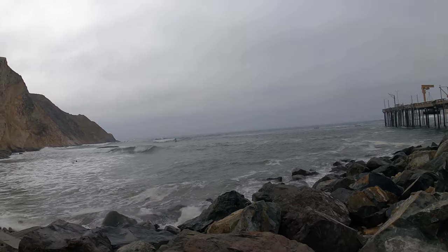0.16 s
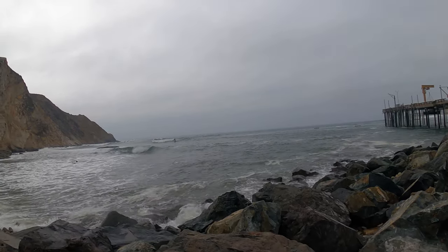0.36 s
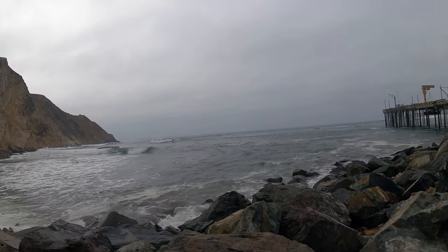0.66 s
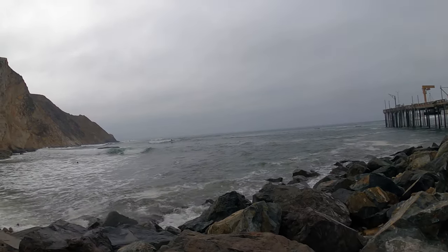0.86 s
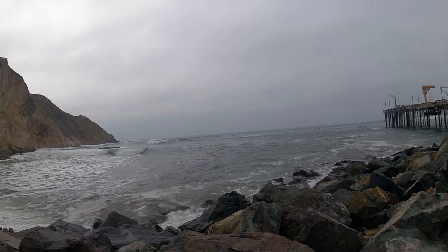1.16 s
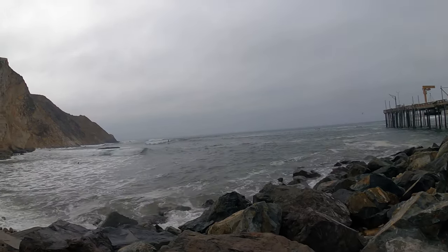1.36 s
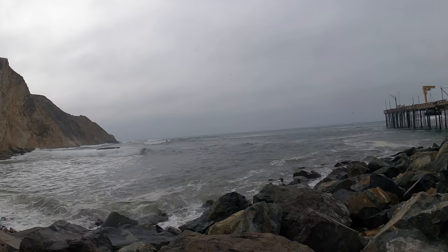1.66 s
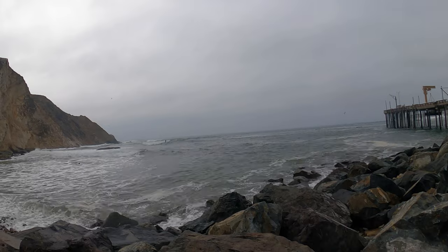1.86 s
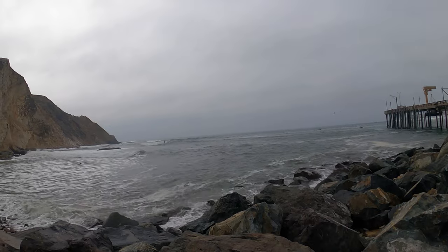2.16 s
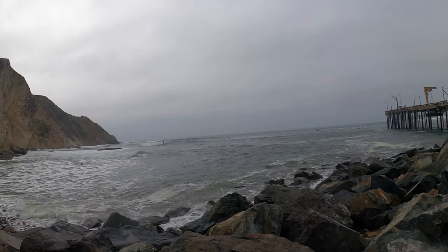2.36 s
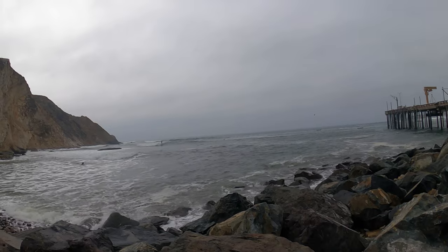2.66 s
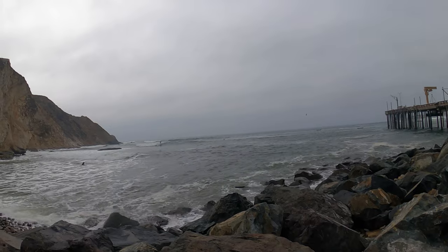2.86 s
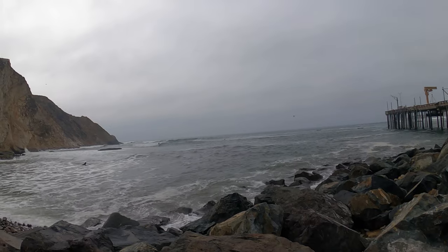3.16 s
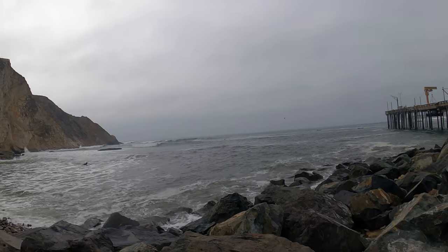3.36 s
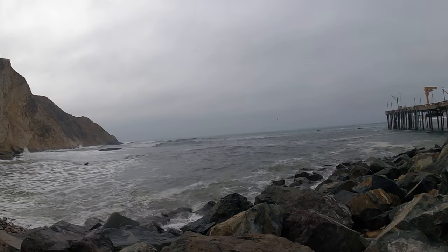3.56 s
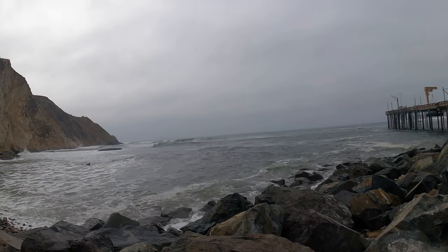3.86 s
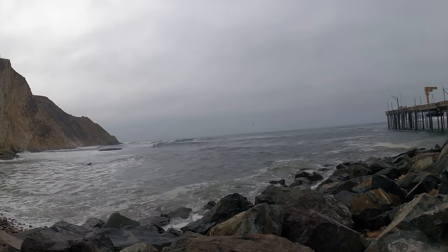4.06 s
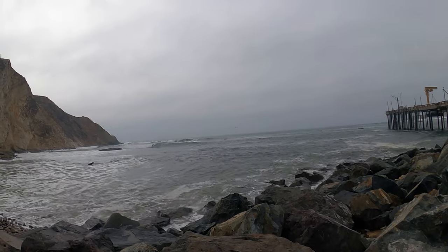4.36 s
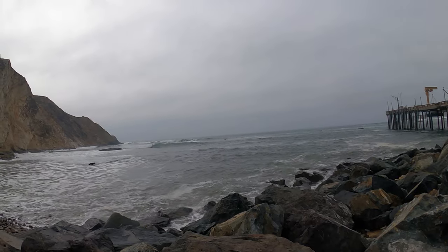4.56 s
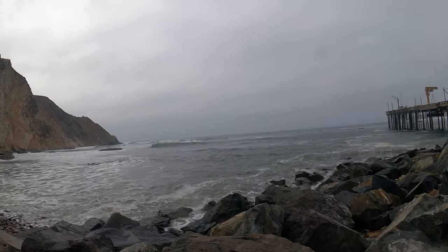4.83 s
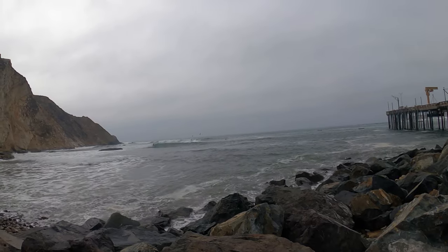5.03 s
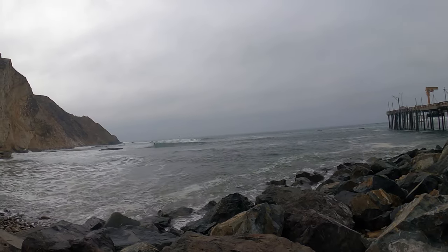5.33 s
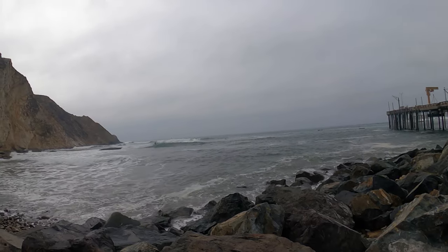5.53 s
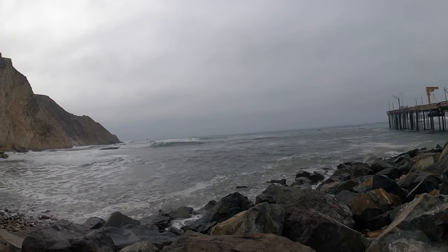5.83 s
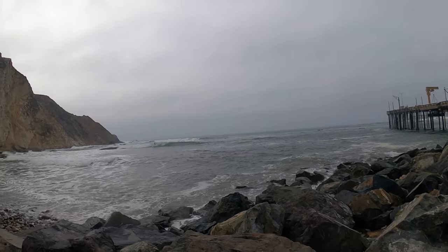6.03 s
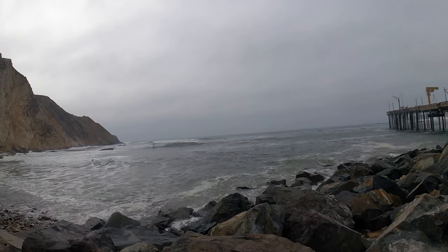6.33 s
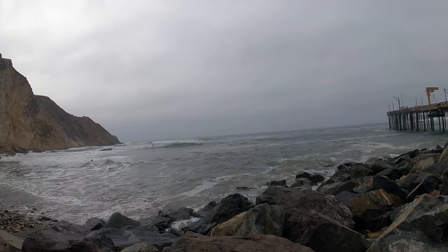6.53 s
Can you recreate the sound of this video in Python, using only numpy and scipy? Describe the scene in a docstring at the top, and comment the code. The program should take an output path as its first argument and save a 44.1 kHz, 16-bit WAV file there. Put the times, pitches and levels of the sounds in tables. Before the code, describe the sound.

Waves churn and glug between rocks, pause, then return with watery plops and splashes over steady foam wash and low wind rumble.

```python
"""A rocky shore, heard from the rocks above it: low surf runs in among the boulders.
Clouds of bubbles throb, churn, lap and gulp in the gaps; crests and splashes ring with swarms of bubbles.
Foam washes and fizzes over the stone, runoff trickles, and at last a wave drains back through shingle.
A breeze rumbles on the single microphone. Swarms of short rings and coloured noise make most of the water;
each gulp is a swelling tone, each lap a burst of resonant noise."""
import sys
import numpy as np
from scipy import signal
from scipy.fft import rfft, irfft, next_fast_len
from scipy.io import wavfile

SR = 44100
rng = np.random.default_rng(int(sys.argv[2]) if len(sys.argv) > 2 else 0)


def pcm_store(signal):
    """Save signal as 16-bit PCM."""
    levels = np.round(np.clip(np.atleast_2d(signal), -1, 1) * 32767)
    wavfile.write(sys.argv[1], SR, levels.astype(np.int16).T)


N = 295017  # samples

# Gusts of the breeze: t of the top/s, level/dB, swell time/s
GUSTS = [(0.12, -25, 0.1), (0.462, -24, 0.087), (0.75, -32.5, 0.13), (1.151, -28, 0.18),
         (1.65, -27.5, 0.15), (2.25, -32, 0.18), (2.79, -28, 0.095), (3.63, -29, 0.13), (4.48, -26, 0.14),
         (4.85, -33, .15), (5.22, -29.5, 0.13), (5.72, -29, .15), (6.39, -22.5, 0.12), (6.65, -25, 0.092)]
# Colour of the wind on the microphone: f/Hz, level per Hz/dB
WIND_COLOUR = [(3, -22), (10, -7), (22, -8.5), (40, 0), (57, 2.5), (76, -1), (100, -0.5), (150, -11.5),
               (300, -17.5), (700, -65)]
# Colour of pebbles rolling in the backwash: f/Hz, level per Hz/dB
SHINGLE_COLOUR = [(600.0, -12), (1000.0, -1), (1300.0, -13), (1450.0, 1.5), (1750.0, -2), (2300.0, -3.5),
                  (2620.0, -6.5), (3050.0, -5), (3400.0, -10.5), (3850.0, -5), (4150, -9.5), (4600.0, -7),
                  (5020.0, -15), (5400, -15.5), (6500.0, -20.5), (12000.0, -44)]
# Water streaming off the nearest boulders: t/s, level/dB
RUNOFF = [(0, -46), (1.08, -46), (1.45, -43.5), (1.7, -46.5), (2.3, -60), (2.7, -65)]
# Colour of that trickle: f/Hz, level per Hz/dB
RUNOFF_COLOUR = [(1500, -28), (1920, -18), (2100, -4), (2400, -0.5), (2650, -7.5), (2870, -15),
                 (3300, -6.5), (3650, -11), (3980, -22), (4300, -10), (4600, -12.5), (4950, -7.5),
                 (5800, -12), (7000, -35)]
# Amount of foam on the rocks, as the level of its hiss before the fizz trim: t/s, level/dB
FOAM = [(0.1, -58.5), (1.05, -60), (1.18, -57.5), (1.69, -56.5), (1.98, -59), (2.3, -60.5), (2.45, -58),
        (2.6, -60.5), (3.25, -57.5), (3.4, -61.5), (4.6, -59), (5.5, -62.5), (5.75, -60.5), (6.07, -60.5),
        (6.6, -57.5)]
# Colour of the bursting foam: f/Hz, level per Hz/dB
FIZZ_COLOUR = [(2500, -22), (4400, 2.5), (5500, -.5), (6500, -4.5), (7700, -8), (9000, -14.5),
               (11000, -19.5), (13000, -23), (14000, -27.5), (15000, -35)]
# Colour of white water spilling over stone: f/Hz, level per Hz/dB
WASH_COLOUR = [(400.0, -25), (850.0, -2.5), (1040.0, 0.5), (1270.0, -1), (1550.0, -4.5), (1750, -3),
               (1920.0, -1.5), (2200.0, -0.5), (2750.0, -6), (3100.0, -5), (3650.0, -8), (4500.0, -8.5),
               (4950.0, -16), (6000.0, -19), (10000.0, -47)]
# Water thrown against a boulder: t/s, level before the trim/dB, swell time/s, pitch of the drops f/Hz
SPLASHES = [(0.02, -44, 0.065, 1060), (1.18, -45, 0.039, 1500), (1.33, -41, .02, 1150),
            (1.36, -46, 0.09, 2300), (1.505, -39, 0.014, 1050), (1.6, -43, .04, 1600),
            (2.12, -43, .03, 1500), (2.32, -42, .03, 2150), (2.366, -39, .0064, 1100),
            (2.465, -41, 0.021, 1150), (2.62, -46, .0064, 1300), (4.47, -48, 0.027, 1500),
            (4.72, -43, 0.02, 1000), (4.883, -34.5, 0.0099, 900), (5.21, -40, 0.01, 1550),
            (5.69, -49, 0.044, 1300), (6.39, -37, .012, 1100), (6.53, -38, .022, 1600)]
# Colour of the patter before each splash picks its pitch: f/Hz, level per Hz/dB
SPLASH_COLOUR = [(500, -16), (900, 5.5), (1500, -0.5), (2400, 0.5), (3200, -10), (6000, -32)]
# Waves running in, before each layer's lag and linger:
# t/s, rise/s, hold/s, fall/s, deep rumble level/dB, churn level/dB, breaking crest level/dB
WAVES = [(-0.4, 0.23, 0.15, 0.47, -28, -36, -49), (1.07, 0.063, 0.64, 0.23, -28.5, -31, -43.5),
         (1.6, 0.44, 0.51, 0.26, -30, -30, -43.5), (4.052, 0.4, 0.47, 0.24, -33.5, -31.5, -47.5),
         (4.978, 0.14, 0.16, 0.051, -45, -31.5, -46), (5.553, 0.075, 0.1, 0.33, -32, -32.5, -45),
         (6.147, 0.44, 0.4, .4, -24.5, -29, -44)]
# Colour of the breaking crests: f/Hz, level per Hz/dB
BREAKER_COLOUR = [(400.0, -1), (860.0, -0.5), (1000.0, 0), (1500.0, 7), (1900.0, 4.5), (2400.0, -1.5),
                  (3080.0, -0.5), (3400, -26), (4000.0, -39), (8000.0, -38)]
# Colour of the throbbing bubble clouds: f/Hz, level per Hz/dB
RUMBLE_COLOUR = [(50, -42), (92, -8.5), (125, 0.5), (165, 1.5), (205, -3), (240, -1.05), (305, -2.4),
                 (345, -9.5), (430, -18.5), (800, -68)]
# Colour of the glugging water between the rocks: f/Hz, level per Hz/dB
CHURN_COLOUR = [(200, -23), (325, -3.5), (385, 0), (455, -2.5), (510, 0.5), (595, 1.5), (640, -6.5),
                (740, -10.5), (840, -21), (1200, -37)]
# Wavelets slapping into hollows: t/s, level before the trim/dB, swell time/s, pitch of the hollow f/Hz
LAPS = [(0.0, -26, 0.018, 330), (0.27, -28.5, 0.025, 430), (0.9, -21, 0.042, 317), (1.19, -19.5, .014, 580),
        (1.68, -27, .05, 288), (1.83, -23.5, .02, 380), (1.98, -22, .016, 560), (2.275, -20.5, 0.03, 278),
        (2.35, -22, 0.016, 190), (2.403, -26, 0.014, 290), (4.607, -19, 0.0099, 340),
        (4.882, -21, .007, 596), (5.0, -28, 0.022, 570), (5.19, -23, 0.0094, 314), (5.6, -28, .025, 260),
        (6.435, -19.5, 0.019, 320), (6.57, -24, .014, 330)]
# Air pockets trapped under the boulders: t/s, peak level before the trim/dB, pitch f/Hz, swell time/s
GULPS = [(0.06, -14, 148, 0.0081), (0.129, -14, 125, 0.0098), (0.257, -18.5, 615, 0.0044),
         (0.31, -18, 477, 0.0028), (0.86, -14, 272, 0.011), (1.205, -14.5, 554, 0.004),
         (1.411, -26, 181, 0.0074), (1.439, -13, 273, 0.0096), (1.495, -14, 530, 0.0025),
         (1.613, -13, 140, 0.0075), (1.80, -11, 140, 0.011), (1.833, -14, 286, 0.0045),
         (1.864, -10, 144, 0.0085), (1.996, -18, 442, 0.0072), (2.159, -7.5, 162, 0.0058),
         (2.299, -16.5, 267, 0.0094), (2.37, -19, 590, .0022), (2.371, -8.5, 210, 0.0097),
         (2.581, -14, 550, 0.0041), (2.914, -14, 170, 0.014), (3.281, -11, 136, 0.013),
         (3.949, -19, 155, 0.0097), (4.241, -22, 161, 0.013), (4.27, -15.5, 540, 0.0037),
         (4.448, -20, 128, 0.012), (4.612, -15, 268, 0.0069), (4.91, -7, 555, 0.0038),
         (4.915, -11.5, 298, 0.0028), (5.005, -15, 527, 0.0022), (5.206, -13.5, 229, 0.0048),
         (5.227, -5.5, 138, 0.0094), (5.27, -12.5, 533, 0.0041), (5.358, -10, 129, 0.0048),
         (5.604, -13, 200, 0.011), (5.666, -9, 155, 0.0037), (6.203, -12, 265, 0.0054),
         (6.381, -12, 267, 0.0054), (6.466, -9.5, 281, 0.0086), (6.594, -11, 272, 0.0094)]
# Dips in the microphone's response: f/Hz, width/Hz, depth as level/dB
DIPS = [(848, 120, -3.5), (1930, 170, -1.7), (2790, 270, -0.5), (3420, 290, -2), (4050, 260, -1.5),
        (5100, 360, -1)]

BREEZE_DB = -31  # steady draught under the gusts
# The backwash grows louder through the shingle, then runs steadily
BACKWASH_FULL_S, BACKWASH_DB, BACKWASH_GROWS_DB_PER_S = 6.5, -34.5, 10
# Level with average foam at t = 0; share of the foam's swing; slow build
WASH_DB, WASH_FOLLOWS, WASH_GROWS_DB_PER_S = -41, 0.36, 0.25
SPLASH_Q = 2.7  # pitch over bandwidth
LAP_WIDTH_HZ, LAP_TOP_HZ = 175, 725
GULP_RISE = 0.013  # share by which the pitch climbs in one swell time
CUTOFF_HZ = 15100  # top of the microphone's range


def from_db(db):
    """Decibels to gain."""
    return 10 ** (np.asarray(db) / 20)


def rms_one(x):
    """Scale to an rms of 1."""
    return x / np.sqrt(np.mean(x ** 2) + 1e-20)


def in_time(rows):
    """Join the points of a table into a curve at every sample."""
    return np.interp(np.arange(N) / SR, *np.transpose(rows))


def coloured(x, spectrum):
    """Give a sound a spectrum, with nothing above its last point; rms 1."""
    hz, db = np.transpose(spectrum)
    size = next_fast_len(N + SR // 2)
    bins_hz = np.maximum(np.arange(size // 2 + 1) * SR / size, 1)
    gain = from_db(np.interp(np.log(bins_hz), np.log(hz), db, right=-np.inf))
    return rms_one(irfft(rfft(x, size) * gain, size)[:N])


def drift(rate_hz):
    """Smooth random wandering, about `rate_hz` changes a second; spread 1."""
    step = 40  # samples between the slow points
    pole = np.exp(-2 * np.pi * rate_hz * step / SR)
    noise = rng.standard_normal(N // step + 2002)
    slow = signal.lfilter([1], [1, -2 * pole, pole * pole], noise)[2000:]  # skip the filter's start
    return np.interp(np.arange(N) / step, np.arange(len(slow)), rms_one(slow))


def grains(per_s, low_hz, high_hz, cycles, spread_db, clump_db, count):
    """A swarm of small rings of uneven size, clumped, with an even spectrum between its edges; rms 1."""
    sizes = from_db(spread_db * np.minimum(rng.exponential(1, N), 4)) * rng.choice([-1, 1], N)
    clicks = sizes * (rng.random(N) < per_s / SR)
    dealt = rng.integers(0, count, N)  # which pitch each click strikes
    out = np.zeros(N)
    for k, hz in enumerate(np.geomspace(low_hz, min(high_hz, CUTOFF_HZ), count)):
        w = 2 * np.pi * hz / SR
        r = np.exp(-np.log(1000) * hz / (cycles * SR))  # down 60 dB after `cycles` cycles
        struck = clicks * (dealt == k) + 1e-18  # the tiny offset keeps the filter from stalling
        ring = signal.lfilter([1 - r, 0, r - 1], [1, -2 * r * np.cos(w), r * r], struck)
        out += ring * from_db(clump_db * drift(14.4))
    return rms_one(out)


def blur(low_hz, high_hz):
    """Countless far bubbles merge into smooth noise; rms 1."""
    band = signal.butter(1, [low_hz, min(high_hz, CUTOFF_HZ)], "band", fs=SR, output="sos")
    return rms_one(signal.sosfilt(band, rng.standard_normal(N)))


def breeze():
    """Level in dB of the wind: gusts swell and fade over a steady draught."""
    t = np.arange(N) / SR
    gusts = sum(from_db(db) ** 2 * np.exp(-((t - s) / swell) ** 2) for s, db, swell in GUSTS)
    return 10 * np.log10(from_db(BREEZE_DB) ** 2 + gusts)


def wind(level_db, lump_db):
    """Eddies buffet the microphone port in lumps."""
    gain = from_db(level_db + lump_db * drift(4.8))
    return gain * coloured(rng.standard_normal(N), WIND_COLOUR)


def shingle(level_db, far_db):
    """Wet pebbles roll and click together under the retreating water."""
    near = grains(per_s=2200, low_hz=900, high_hz=6940, cycles=18.0, spread_db=0.5, clump_db=3.0, count=24)
    return from_db(level_db) * coloured(near + from_db(far_db) * blur(600, 10000), SHINGLE_COLOUR)


def runoff(far_db):
    """The first waves stream back off the nearest boulders in a narrow, bright trickle."""
    near = grains(per_s=3000, low_hz=1900, high_hz=4590, cycles=35, spread_db=3.5, clump_db=0.5, count=16)
    return from_db(in_time(RUNOFF)) * coloured(near + from_db(far_db) * blur(1500, 5600), RUNOFF_COLOUR)


def fizz(level_db, far_db, flutter_db, trim_db):
    """The foam left behind bursts in tiny pops."""
    near = grains(per_s=9000, low_hz=3480, high_hz=13900, cycles=3.7, spread_db=1.0, clump_db=1.5, count=10)
    foam = coloured(near + from_db(far_db) * blur(2000, 15000), FIZZ_COLOUR)
    return from_db(level_db + trim_db + flutter_db * drift(12.0)) * foam


def wash(level_db, far_db, flutter_db):
    """Sheets of white water spill over the stone and shed small bubbles."""
    near = grains(per_s=7000, low_hz=774, high_hz=6300, cycles=13.0, spread_db=1.0, clump_db=1.1, count=24)
    water = coloured(near + from_db(far_db) * blur(370, 9000), WASH_COLOUR)
    return from_db(level_db + flutter_db * drift(3.7)) * water


def splashes(level_db, far_db):
    """Water thrown against a boulder falls back in a brief patter; big drops sound lower than small ones."""
    out, t = np.zeros(N), np.arange(N) / SR
    drops = grains(per_s=1800, low_hz=816, high_hz=2810, cycles=13, spread_db=5.0, clump_db=0.0, count=14)
    patter = coloured(drops + from_db(far_db) * blur(500, 5000), SPLASH_COLOUR)
    for s, db, swell, hz in SPLASHES:
        age = np.maximum(t - s, 0) / swell
        spray = signal.lfilter(*signal.iirpeak(hz, SPLASH_Q, fs=SR), patter)
        out += from_db(db + level_db) * age * np.exp(1 - age) * rms_one(spray)
    return out


def surge(crests_db, calm_db, lag_s, linger):
    """Level in dB of a wave-driven sound: each wave rises, holds and dies back into a steady calm level."""
    t = np.arange(N) / SR - lag_s
    power = from_db(calm_db) ** 2
    for (s, rise, hold, fall, *_), crest_db in zip(WAVES, crests_db):
        run_in = np.clip((t - s) / rise, 0, 1)
        die_back = np.exp(-np.maximum(t - s - rise - hold, 0) / (fall * linger))
        power = power + (from_db(crest_db) * run_in * die_back) ** 2
    return 10 * np.log10(power)


def breakers(level_db, far_db):
    """A falling crest drives air under, and a swarm of middle-sized bubbles rings."""
    near = grains(per_s=2500, low_hz=840, high_hz=3340, cycles=18.0, spread_db=4.0, clump_db=1.5, count=20)
    return from_db(level_db) * coloured(near + from_db(far_db) * blur(400, 6100), BREAKER_COLOUR)


def rumble(level_db, lump_db):
    """Whole clouds of bubbles throb in the breaking water."""
    gain = from_db(level_db + lump_db * drift(18.0))
    return gain * coloured(rng.standard_normal(N), RUMBLE_COLOUR)


def churn(level_db, far_db, slosh_db):
    """Large bubbles glug as water tumbles between the rocks."""
    near = grains(per_s=1800, low_hz=297, high_hz=837, cycles=8.8, spread_db=1.5, clump_db=0.5, count=12)
    gain = from_db(level_db + slosh_db * drift(21.0))
    return gain * coloured(near + from_db(far_db) * blur(190, 1520), CHURN_COLOUR)


def laps(level_db):
    """A wavelet fills a hollow: a short, dull surge of noise around the hollow's pitch."""
    out, t = np.zeros(N + SR), np.arange(SR // 4) / SR
    for s, db, swell, hz in LAPS:
        resonance = signal.iirpeak(hz, hz / LAP_WIDTH_HZ, fs=SR)
        hollow = signal.lfilter(*resonance, rng.standard_normal(len(t)))
        age, start = t / swell, round(s * SR)
        out[start:start + len(t)] += from_db(db + level_db) * age * np.exp(1 - age) * rms_one(hollow)
    return signal.sosfilt(signal.butter(8, LAP_TOP_HZ, fs=SR, output="sos"), out[:N])


def gulps(level_db):
    """A trapped pocket of air swells into a few cycles of ringing and dies, its pitch climbing as it rises."""
    out, t = np.zeros(N), np.arange(SR // 4) / SR
    for s, peak_db, hz, swell in GULPS:
        age, start = t / swell, round(s * SR)
        turns = np.cumsum(hz * (1 + GULP_RISE * (age - 1))) / SR  # the listed pitch falls on the peak
        tone = np.sin(2 * np.pi * (turns + rng.random()))
        pocket = (age * np.exp(1 - age)) ** 2 * tone
        out[start:start + len(t)] += from_db(peak_db + level_db) * pocket[:N - start]
    return out


def scene():
    """Waves drive the deep water and the breakers, foam drives the hiss; all meet the wind at one microphone."""
    t, foam_db = np.arange(N) / SR, in_time(FOAM)
    rumbles, churns, crests = np.transpose(WAVES)[4:]
    rumble_db = surge(rumbles, calm_db=-25.0, lag_s=0.02, linger=0.97)
    churn_db = surge(churns, calm_db=-32.0, lag_s=0.047, linger=1.8)
    breaker_db = surge(crests, calm_db=-54, lag_s=0.03, linger=1.5)
    wash_db = WASH_DB + WASH_FOLLOWS * (foam_db - foam_db.mean()) + WASH_GROWS_DB_PER_S * t
    shingle_db = BACKWASH_DB - BACKWASH_GROWS_DB_PER_S * np.maximum(BACKWASH_FULL_S - t, 0)

    deep = rumble(rumble_db, lump_db=0.03) + churn(churn_db, far_db=-1.0, slosh_db=0.1)
    deep += gulps(level_db=-3.64) + laps(level_db=-3.5)
    white = wash(wash_db, far_db=4.0, flutter_db=0.33)
    white += fizz(foam_db, far_db=3.0, flutter_db=0.6, trim_db=6.5)
    white += runoff(far_db=-2.0)
    beach = breakers(breaker_db, far_db=-0.5) + splashes(level_db=-1.5, far_db=-10)
    beach += shingle(shingle_db, far_db=4.0)
    return (deep + white + beach + wind(breeze(), lump_db=2.0))[None]  # one channel


def record(dry):
    """The microphone has a few shallow dips from the upper middle into the treble; the top is cut steeply."""
    for hz, width_hz, db in DIPS:
        band = signal.lfilter(*signal.iirpeak(hz, hz / width_hz, fs=SR), dry)
        dry = dry + (from_db(db) - 1) * band
    return signal.sosfilt(signal.ellip(10, 0.1, 80, CUTOFF_HZ, fs=SR, output="sos"), dry)


dry = scene()
out = record(dry)
pcm_store(out)
```